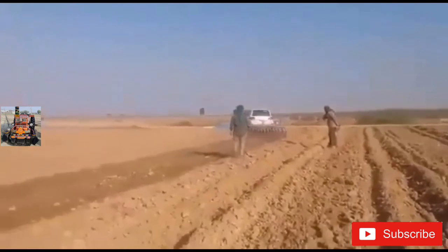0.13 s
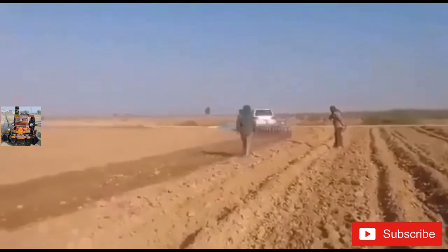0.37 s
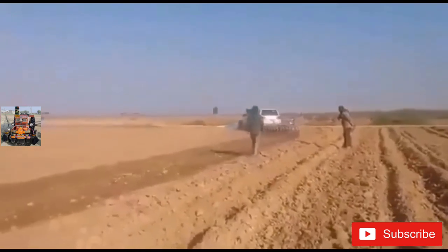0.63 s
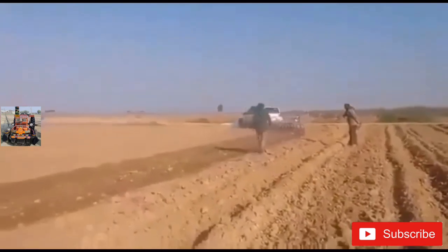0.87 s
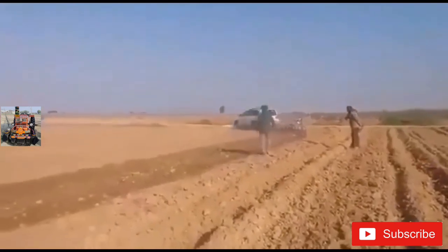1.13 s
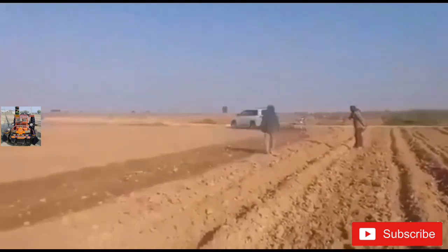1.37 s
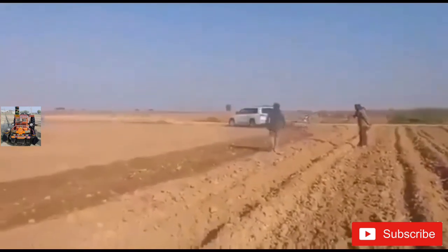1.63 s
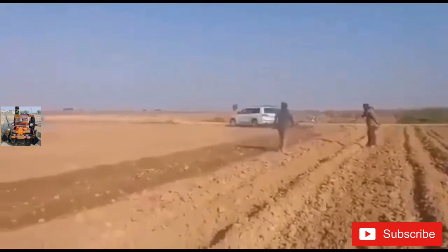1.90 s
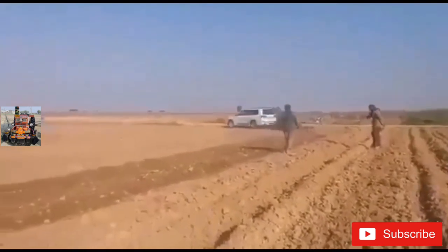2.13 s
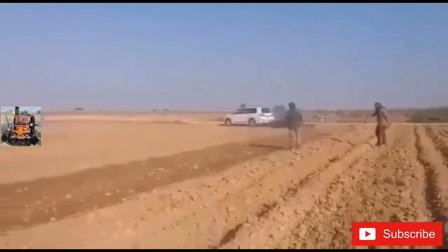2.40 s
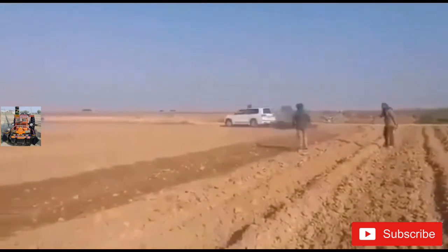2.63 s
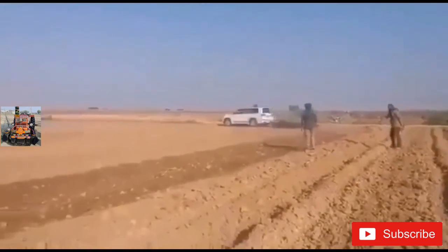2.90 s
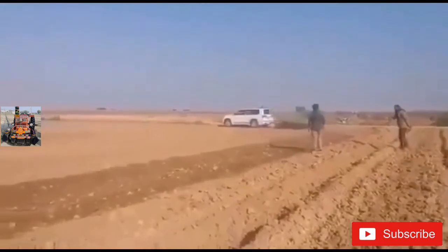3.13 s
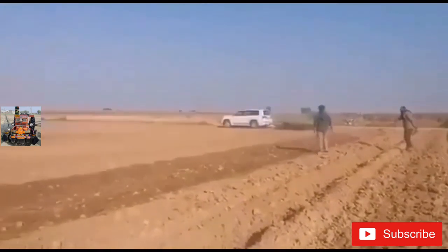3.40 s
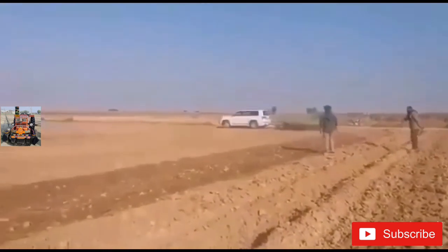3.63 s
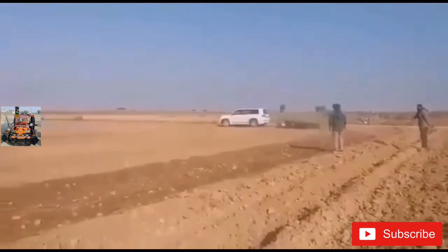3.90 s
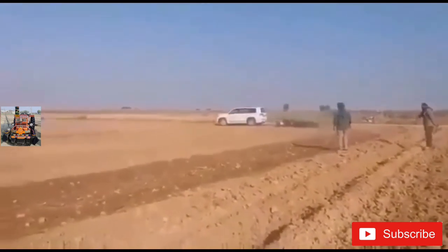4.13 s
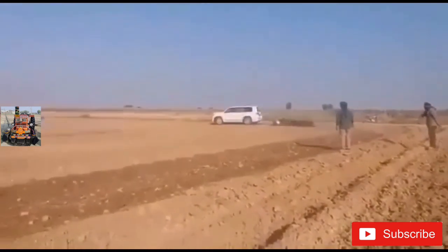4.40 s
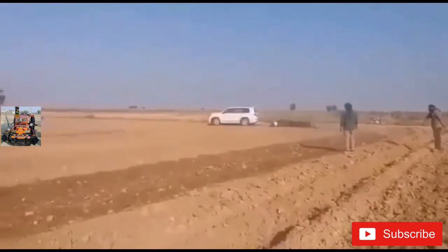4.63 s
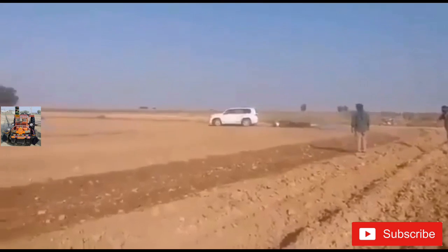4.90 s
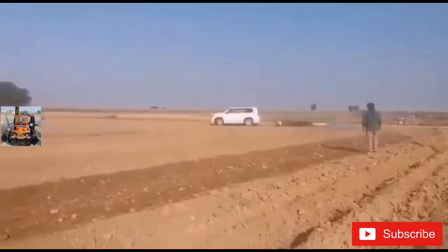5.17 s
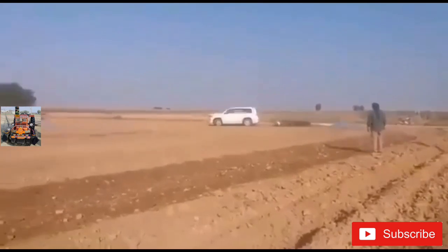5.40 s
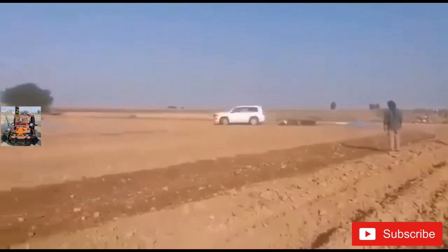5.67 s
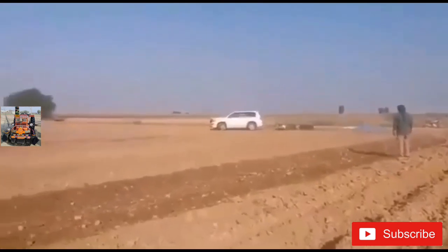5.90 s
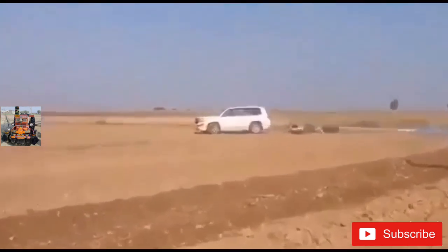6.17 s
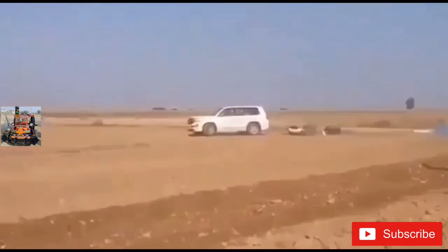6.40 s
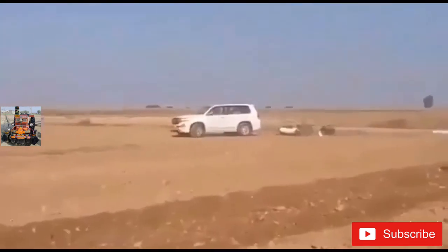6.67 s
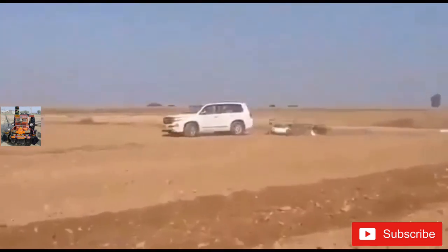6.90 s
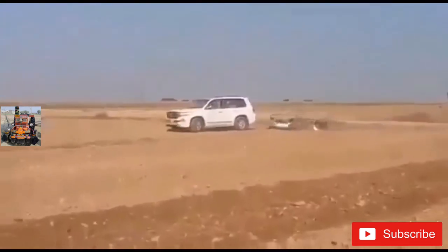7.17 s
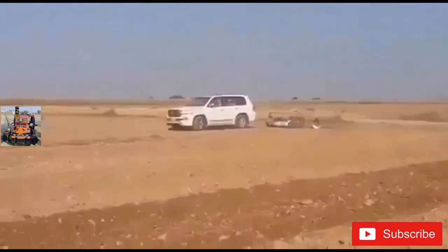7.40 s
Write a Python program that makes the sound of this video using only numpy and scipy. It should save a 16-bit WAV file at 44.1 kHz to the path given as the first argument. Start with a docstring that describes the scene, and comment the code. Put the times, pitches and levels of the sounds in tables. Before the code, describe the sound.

A heavy eight-cylinder turbo engine tows a harrow over dry ground, heard in mono from across an open field. From 0 s a deep, loping exhaust drone, firing about eighty times a second, briefly surges, then sags under load until 2.5 s. A buzzing turbo whistle near 7 kHz is strong at first, then fades and flickers. An initial bright rush dies away, with sparse grit ticks close by. Around 2.6 and 3.4 s the engine surges, and fan roar swells over soil hiss; light chinks sound near 2.8 s, a tiny squeak at 3.3 s and another chink at 3.4 s. From 4 s it pulls faster, with a chink at 4.6 s. After 5.4 s the drone rises and the whistle climbs towards 8 kHz, dipping near 6.5 s. The roar dulls, a low wind lump passes at 6.7 s, and small clinks come at 7.1 and 7.4 s as the engine runs on.

```python
"""An eight-cylinder turbo engine pulls a harrow over a dry field, some way off, and turns side-on.
Exhaust: drifting firing tones, eighth orders and gas noise. Turbo: blade tones swinging with each firing.
Fan roar swells over rumble and soil hiss, all shaped noise; wind, air and hums are noise bands.
Near by, grit ticks underfoot, metal chinks and a squeak are short decaying or swelling tones and puffs."""
import sys
import numpy as np
from scipy import signal
from scipy.io import wavfile
from scipy.ndimage import uniform_filter1d, map_coordinates

SR = 44100
rng = np.random.default_rng(int(sys.argv[2]) if len(sys.argv) > 2 else 0)


def boost_factor(decibels):
    """Convert a level in decibels to a linear amplitude factor."""
    exponent = np.asarray(decibels, float) / 20
    return 10 ** exponent


def inscribe(sig):
    """Save sig as 16-bit PCM at rate SR to the path in sys.argv[1].

    A 1-D sig is mono; a 2-D sig holds one channel per row.
    Samples are clipped to [-1, 1] before scaling.
    """
    pcm = np.round(np.clip(np.atleast_2d(sig).T, -1, 1) * 32767)
    wavfile.write(sys.argv[1], SR, pcm.astype(np.int16))


N = 332514

# Spectral shapes set relative levels only: noise() scales each to rms 1.
# lumpy low air: t/s, level/dB
WIND_LEVEL = [(0, -52), (.6, -57.5), (2, -50.5), (4.5, -55.5), (5.3, -49.5), (6.2, -53), (6.7, -42.5),
              (7.54, -58)]
# shape of the lumps: f/Hz, level/dB
WIND_SHAPE = [(12, -39.5), (28, -17), (48, 0), (62, 1), (80, -31.5), (200, -84.0)]
# hiss around 9 kHz: t/s, level/dB
AIR_LOW_LEVEL = [(0, -106), (.3, -75), (3.4, -75), (3.7, -78), (4.9, -73.5), (5.25, -84), (5.55, -65.5),
                 (6.1, -75), (7.54, -85.5)]
# shapes of the two air bands: f/Hz, level/dB
AIR_LOW_SHAPE = [(6500, -35.5), (7400, 1.5), (9500, -4.5), (10300, -11.5), (11200, -42.0)]
AIR_HIGH_SHAPE = [(9000, -39), (10300, -6.5), (13000, -2.0), (15500, -12.0), (16000, -59.5)]
# flares of the upper hiss: centre t/s, level/dB, half width/s
AIR_FLARES = [(.45, -78.5, 0.4), (1.509, -75.5, .05), (2.55, -79, .015), (7.17, -77.5, .015)]
# wavering hums at fixed pitch: f/Hz, width/Hz
HUM_BANDS = [(204, 4.3), (275.8, 5.7), (325, 8), (380, 8), (452, 6.5)]
# their levels: t/s, then level/dB of each hum in that order
HUM_LEVELS = [(0, -53.5, -55, -62.5, -78.5, -78), (1.6, -63, -59, -70.5, -77.5, -76),
              (2.5, -61, -53.5, -71, -75, -76), (3.6, -59, -60, -67.5, -71, -74.5),
              (4.6, -49, -53.5, -70, -66.5, -70), (5.1, -47.5, -64, -62.5, -63.5, -68.5),
              (5.6, -54.5, -59, -64, -64, -70), (6.2, -51, -68, -54.5, -63, -75),
              (6.9, -56, -64, -66, -65.5, -73), (7.54, -51, -65.5, -63, -65, -77)]
# engine-bay rumble shape: f/Hz, level/dB
RUMBLE_SHAPE = [(240, -32), (400, 0.5), (415, -3), (451, -3.5), (554, -6), (704, -4), (854, -2.5),
                (1200, -2), (1560, -29), (2640, -120)]
# soil hiss shape: f/Hz, level/dB
SOIL_SHAPE = [(710, -38.5), (1200, -5), (1580, -6.5), (1770, -7), (2180, 0), (2650, -7), (3280, -7),
              (3720, -11), (4480, -9), (5010, -15), (5330, -11), (6000, -13.5), (6300, -13.5),
              (8190, -36.5), (13900, -120)]
# drifting lifted band of the soil hiss, perhaps ground reflection: t/s, f/Hz, lift/dB, half width/Hz
GROUND_LIFT = [(0, 3440, -1, 604), (1.8, 3160, 5, 302), (2.1, 3270, 7.5, 201), (2.8, 3320, 6, 250),
               (3.3, 3510, 4, 552), (4.1, 3730, 8, 620), (4.75, 3700, 6.5, 616), (5.4, 3302, 1.5, 500),
               (6.2, 3310, 2, 402), (7.54, 3300, 5, 400)]
# brighter rush, shape: f/Hz, level/dB
GUST_SHAPE = [(880, -36), (1500, -10), (2070, -5), (2530, -1), (3500, -12.5), (4370, -7.5), (5170, -14.5),
              (6300, -17.5), (8190, -56), (13900, -120)]
# fan roar shape before tilt: f/Hz, level/dB
FAN_SHAPE = [(590, -48), (1000, -9.5), (1070, -10), (1200, -8), (1620, 2.5), (1810, -2), (2180, -2),
             (2520, -16), (2710, -29), (2800, -22.5), (3640, -49.5), (6160, -120)]
# fan roar, swelling as the vehicle turns side-on, then dulling: t/s, level/dB, tilt/(dB per octave)
FAN_ROAR = [(0, -63, -8), (1.5, -63, 2), (2, -59, -3), (2.8, -51.5, 3.5), (3.1, -54, 6), (3.35, -49, 7),
            (3.7, -52.5, 7), (4.18, -48, 6.5), (5.28, -49.5, -3.5), (5.42, -48, 2.5), (6.05, -48.5, -0.5),
            (6.25, -50.5, -6), (7.2, -49, -4), (7.54, -51, -7)]
# loudest grit ticks: t/s, level/dB, f/Hz
GRIT_TICKS = [(0.5656, -57, 9080), (1.6688, -63, 9500), (1.868, -56, 10850), (2.0057, -57.5, 9000),
              (2.0792, -59, 9420), (2.3126, -60, 10940), (2.455, -61, 9580), (2.5443, -63.5, 9300),
              (5.5676, -59, 9140), (6.8209, -66, 12730), (7.1654, -63, 9120), (7.4874, -61.5, 9300)]
# squeak partials: centre t/s, f/Hz, level/dB
SQUEAK_PARTIALS = [(3.332, 2684, -45), (3.338, 5460, -52), (3.338, 8100, -61)]
# metal chinks: t/s, level before trim/dB, t60/s, f/Hz
METAL_CHINKS = [(2.7541, -38.5, 0.023, 3210), (2.8115, -42, .015, 3320), (3.443, -43.5, 0.035, 5630),
                (4.559, -33, 0.053, 1640), (7.055, -34, 0.039, 1803), (7.386, -36.5, .04, 4060)]
# modes of a chink: factor on f, level/dB
CHINK_MODES = [(.82, -2), (1, 4), (1.17, -3), (1.38, -3.5), (1.53, -9.5)]
# turbo whistle, first wheel's centre pitch: t/s, f/Hz, level/dB
TURBO_WHISTLE = [(0, 6785, -47.5), (.25, 6950, -55.5), (.8, 7120, -61), (1.2, 6867, -65.5),
                 (1.41, 6793, -54), (1.5, 6800, -60.5), (2.45, 6767, -62.5), (2.8, 6887, -61.5),
                 (3.05, 6790, -63), (3.19, 6754, -56), (3.4, 6950, -64), (3.65, 7030, -54),
                 (4.2, 7054, -59), (4.98, 7286, -63), (5.31, 7430, -55), (5.45, 7510, -60.5),
                 (5.8, 7820, -58.5), (6.22, 8110, -57.5), (6.4, 8050, -63.5), (6.68, 7950, -56),
                 (7.54, 8220, -59)]
# engine bogging down in heavy soil and surging free: t/s, firing rate/Hz, effort/dB
ENGINE_RUN = [(0, 79.85, -2), (.2, 83.55, 1), (.55, 80.35, -1), (.9, 77.6, -2.5), (1.17, 75.26, 0.5),
              (1.37, 77.74, -2), (1.52, 75.5, -1), (1.8, 77.3, -1), (2.17, 78.23, 0), (2.35, 75, -2),
              (2.6, 78.95, 2), (2.65, 82.54, -1.5), (2.85, 81.1, -1), (2.99, 78.7, -3.5), (3.12, 76.33, 2),
              (3.25, 79.26, 2), (3.31, 82.93, -1.5), (3.45, 85.16, -1.5), (3.53, 82.45, -2),
              (3.6, 79.3, -3.5), (3.7, 79.95, -0.5), (3.9, 80.1, -1), (4.2, 85.3, 1.5), (4.4, 82, -3),
              (4.52, 83.62, 1), (4.65, 86.63, -1), (5.33, 84.64, -1), (5.45, 89, 0), (5.62, 92.03, 0),
              (5.9, 89.16, 0.5), (6.02, 92.56, 2), (6.12, 93.8, -5.5), (6.26, 91.5, -0.5),
              (6.52, 87.14, 0.5), (6.78, 90.43, 1), (6.9, 90.96, -4), (7.02, 90.2, -0.5), (7.15, 91.74, -1),
              (7.54, 91.85, -1)]
# pipe response to cylinder unevenness and gas noise: f/Hz, level/dB (relative)
PIPE_RESPONSE = [(30, -68.5), (65, -46.5), (110, -40), (137, -43), (153, -31.5), (170, -45), (188, -49),
                 (206, -49.5), (228, -59.5), (255, -63), (277, -56), (295, -58), (325, -58), (380, -66.5),
                 (420, -75.5), (455, -69), (520, -90)]
# pipe response to firing tone and 2nd multiple, before effort: f/Hz, level/dB rms
PIPE_BOOM = [(75, -41.5), (79, -35), (83, -32), (87, -26.5), (94, -27.5), (150, -27), (157, -28),
             (161, -31), (166, -37), (172, -40.5), (188, -42.5)]
# 4th multiple when the 2nd stands at -27.5 dB: t/s, level/dB
FOURTH_LEVEL = [(0, -64), (1.5, -61), (1.9, -51), (2.5, -53.5), (3.3, -54.5), (3.8, -52.5), (4.4, -53),
                (7.54, -54.5)]


def evened(x):
    """Scale to rms 1."""
    return x / np.sqrt(np.mean(x ** 2) + 1e-20)


def read(points, hz):
    """Interpolate a spectral table over log frequency."""
    f, value = np.transpose(points)
    return np.interp(np.log(hz + 1), np.log(f + 1), value)


def curves(rows, t=None):
    """Columns of a timed table, read per sample or at times t."""
    s, *columns = np.transpose(rows)
    at = np.arange(N) / SR if t is None else t
    return [np.interp(at, s, c) for c in columns]


def add(mix, s, sound):
    """Add sound to mix in place from time s."""
    part = mix[max(round(s * SR), 0):][:len(sound)]
    part += sound[:len(part)]


def drift(hz):
    """Slow random curve of rms near 1, up to about hz."""
    knots = rng.standard_normal(4000)
    step = SR / np.clip(hz, .1, 250) / 2
    return map_coordinates(knots, [np.arange(N) / step], order=3)


def noise(shape_db, size, patchy_db):
    """Random short-time spectra under shape_db(f, t), with drifting patches, at rms 1."""
    hop = size // 4
    t = np.arange(N // hop + 5) * hop / SR
    hz = np.fft.rfftfreq(size, 1 / SR)[:, None]
    a, b, patches = rng.standard_normal((len(t), len(hz), 3)).T
    patches = uniform_filter1d(patches, size=8, axis=0)
    patches = evened(uniform_filter1d(patches, size=10, axis=1))
    z = (a + 1j * b) * boost_factor(shape_db(hz, t) + patchy_db * patches)
    return evened(signal.istft(z, nperseg=size, noverlap=size - hop)[1][:N])


def firing_turns():
    """Firing phase in cycles: the running integral of firing rate."""
    return np.cumsum(curves(ENGINE_RUN)[0]) / SR


def wind():
    """Low lumps of air: noise mostly at 30-80 Hz, wavering in level."""
    lumps = noise(lambda f, t: read(WIND_SHAPE, f), 8192, patchy_db=1.0)
    return boost_factor(curves(WIND_LEVEL)[0] + 2.2 * drift(2.5)) * lumps


def air():
    """Faint high hiss in two noise bands; the upper one flares now and then."""
    low = noise(lambda f, t: read(AIR_LOW_SHAPE, f), 256, patchy_db=3.0)
    high = noise(lambda f, t: read(AIR_HIGH_SHAPE, f), 256, patchy_db=2.0)
    t = np.arange(N) / SR
    flares = sum(boost_factor(db) * np.exp(-((t - s) / half_s) ** 2) for s, db, half_s in AIR_FLARES)
    steady_db = -84.5
    return boost_factor(curves(AIR_LOW_LEVEL)[0]) * low + (boost_factor(steady_db) + flares) * high


def hums():
    """Narrow noise bands whose pitch stays put while engine speed moves."""
    waver_db, waver_hz = 1.5, 3.2
    out = 0
    for (hz, width_hz), db in zip(HUM_BANDS, curves(HUM_LEVELS)):
        band = noise(lambda f, _: -20 * np.log10(1 + ((f - hz) / width_hz * 2) ** 2), 16384, patchy_db=2)
        out = out + boost_factor(db + waver_db * drift(waver_hz)) * band
    return out


def rumble(faster_hz):
    """Engine-bay noise, growing with speed and as the vehicle comes nearer."""
    start_db, db_per_hz, db_per_s = -64, 0.0966, 0.29
    band = noise(lambda f, t: read(RUMBLE_SHAPE, f), 2048, patchy_db=1.5)
    return boost_factor(start_db + db_per_hz * faster_hz + db_per_s * np.arange(N) / SR) * band


def soil(faster_hz):
    """Hiss of discs in soil: noise with a drifting lifted band, growing with speed."""
    def shape_db(f, t):
        hz, lift_db, half_hz = curves(GROUND_LIFT, t)
        return read(SOIL_SHAPE, f) + lift_db * np.exp(-((f - hz) / half_hz) ** 4)
    level_db, db_per_hz = -58, 0.1976
    hiss = noise(shape_db, 512, patchy_db=1.5)
    return boost_factor(level_db + db_per_hz * faster_hz + 0.82 * drift(1.377)) * hiss


def gust():
    """A brighter noise rush, decaying exponentially from the start."""
    start_db, t60_s = -51, 2.7
    band = noise(lambda f, t: read(GUST_SHAPE, f), 512, patchy_db=0.0)
    return boost_factor(start_db - 60 * np.arange(N) / SR / t60_s) * band


def fan():
    """Fan roar: broadband noise whose spectral tilt pivots at 1700 Hz."""
    def shape_db(f, t):
        return read(FAN_SHAPE, f) + curves(FAN_ROAR, t)[1] * np.log2((f + 1) / 1700)
    return boost_factor(curves(FAN_ROAR)[0]) * noise(shape_db, 1024, patchy_db=1.3)


def rush():
    """Rumble, fan roar and soil hiss, faintly pumped by the firings, plus the gust."""
    faster_hz = curves(ENGINE_RUN)[0] - 80
    pump = 1 + 0.052 * np.cos(2 * np.pi * firing_turns())
    return pump * (rumble(faster_hz) + fan() + soil(faster_hz)) + gust()


def faint_grit():
    """Sparse random ticks: decaying tones at 8.3 and 9.1 kHz, a few larger."""
    ticks_per_s, level_db, t60_s = 14, -68.5, .008
    t = np.arange(400) / SR
    size = boost_factor(4.5 * np.minimum(rng.exponential(1, N), 3))
    hits = size * (rng.random(N) < ticks_per_s / SR)
    tones = np.sin(2 * np.pi * 8300 * t) + 0.65 * np.sin(2 * np.pi * 9100 * t)
    return boost_factor(level_db) * signal.oaconvolve(hits, boost_factor(-60 * t / t60_s) * tones)[:N]


def grit():
    """Louder ticks: smoothed noise puffs shifted up to a bright carrier, decaying fast."""
    t60_s, attack_s = 0.022, .0012
    out, t = np.zeros(N), np.arange(600) / SR
    for (s, db, hz), puff in zip(GRIT_TICKS, rng.standard_normal((len(GRIT_TICKS), 600))):
        smooth = uniform_filter1d(uniform_filter1d(puff, size=7), size=7)
        band = evened(smooth) * np.cos(2 * np.pi * hz * t)
        add(out, s, boost_factor(db - 60 * t / t60_s) * band * np.minimum(t / attack_s, 1))
    return out


def squeak():
    """One squeak: tone and overtones under a Gaussian swell."""
    out, t = np.zeros(N), np.arange(4000) / SR
    for s, hz, db in SQUEAK_PARTIALS:
        swell = np.exp(-((t - .02) / 0.0048) ** 2)
        add(out, s - .02, boost_factor(db) * swell * np.sin(2 * np.pi * hz * t))
    return out


def chinks():
    """Metal chinks: inharmonic modes ringing down together."""
    trim_db, attack_s = -8.5, 0.00078
    out, t = np.zeros(N), np.arange(4000) / SR
    for s, db, t60_s, hz in METAL_CHINKS:
        ring = sum(boost_factor(m_db) * np.sin(2 * np.pi * hz * m * t) for m, m_db in CHINK_MODES)
        add(out, s, boost_factor(db + trim_db - 60 * t / t60_s) * ring * np.minimum(t / attack_s, 1))
    return out


def whoosh():
    """Intake air noise, a band just under the whistle pitch."""
    def shape_db(f, t):
        return -9.0 * ((f - 0.945 * curves(TURBO_WHISTLE, t)[0]) / 900) ** 2
    return noise(shape_db, 512, patchy_db=4.5)


def shaft(whistle_hz):
    """Faint tone once per turn of the ten-bladed turbo wheel, following the roar level."""
    level_db, blades = -71, 10  # level when the roar stands at -50 dB
    gain = boost_factor(level_db + .4 * (curves(FAN_ROAR)[0] + 50) + 3 * drift(4))
    turns = np.cumsum(whistle_hz) / SR / blades + .17 * drift(12)
    return gain * np.cos(2 * np.pi * turns)


def turbo():
    """Two turbo wheels; each exhaust pulse kicks them, so the blade tones swing once a firing."""
    hz, level_db = curves(TURBO_WHISTLE)
    depth_hz = 318 + 0.051 * (hz - 7000)
    rough = np.clip(.05 + 0.14 * (hz - 7000) / 1000, 0, 1)  # swing frays as the whistle climbs
    turns = firing_turns()
    blade_tones = 0
    for detune, lag_rad, share_db in ((1.0, 0, -7), (1.015, 2.5, -11)):
        swing = np.cos(2 * np.pi * turns + lag_rad) + 0.19 * np.cos(4 * np.pi * turns + 0.78)
        pitch_hz = detune * hz + depth_hz * (swing + rough * drift(180))
        flutter_db = share_db + 3.85 * drift(240) + 2.02 * drift(15)
        blade_tones = blade_tones + boost_factor(flutter_db) * np.cos(2 * np.pi * np.cumsum(pitch_hz) / SR)
    whoosh_db = -12.5  # relative to the blade tones
    whistle = evened(blade_tones) + boost_factor(whoosh_db) * whoosh()
    return boost_factor(level_db + 1.3 * drift(5)) * whistle + shaft(hz)


def firing_tones(hz, effort_db):
    """Firing rate and its 2nd and 4th multiples; the 2nd booms when the engine bogs down."""
    second_db = read(PIPE_BOOM, 2 * hz) + effort_db
    fourth_db = curves(FOURTH_LEVEL)[0] + .8 * (second_db + 27.5)
    first_db = read(PIPE_BOOM, hz) + effort_db
    turns = firing_turns() + 0.006 * drift(25)
    # multiple, level/dB, lag/rad, waver/dB, phase fray/cycles
    voices = ((1, first_db, 0, .5, 0), (2, second_db, 1.7, .9, 0.012), (4, fourth_db, 0, 3.5, 0.1))
    tones = 0
    for k, db, lag_rad, waver_db, fray in voices:
        phase = 2 * np.pi * (k * turns + fray * drift(15)) + lag_rad
        tones = tones + boost_factor(db + waver_db * drift(12)) * np.cos(phase)
    return np.sqrt(2) * tones, turns


def lope(hz, turns):
    """Eighth orders from unequal cylinders and gas noise through the pipe, growing with speed."""
    level_db, db_per_hz, gas_db = -41.5, 0.37, -8.5  # level at 79.5 firings/s; gas relative to orders
    orders = 0
    for k in set(range(2, 48)) - {8, 16, 32}:
        wander = rng.random() + .0001 * k ** 2 * drift(12)  # higher orders lose step sooner
        gain = boost_factor(read(PIPE_RESPONSE, hz * k / 8) + 2.0 * drift(1.2))
        orders = orders + gain * np.cos(2 * np.pi * (k / 8 * turns + wander))
    gas = noise(lambda f, t: read(PIPE_RESPONSE, f) - 60 * (f > 600), 8192, patchy_db=2.0)
    return boost_factor(level_db + db_per_hz * (hz - 79.5)) * (evened(orders) + boost_factor(gas_db) * gas)


def exhaust():
    """Exhaust drone: firing tones plus the lope, locked to one firing phase."""
    hz, effort_db = curves(ENGINE_RUN)
    tones, turns = firing_tones(hz, effort_db)
    return tones + lope(hz, turns)


def scene():
    """Sum of all layers, one channel."""
    background = wind() + air() + hums() + rush()
    near = faint_grit() + grit() + squeak() + chinks()
    return (background + near + turbo() + exhaust())[None]


def band_limit(x):
    """A steep low-pass at the top of the band."""
    return signal.sosfilt(signal.butter(12, 15700, fs=SR, output="sos"), x)


def record(dry):
    """Finish the mix."""
    return band_limit(dry)


dry = scene()
out = record(dry)
inscribe(out)
```